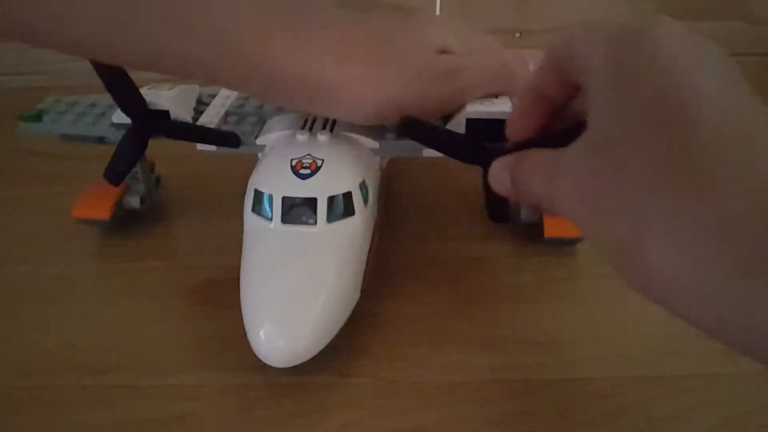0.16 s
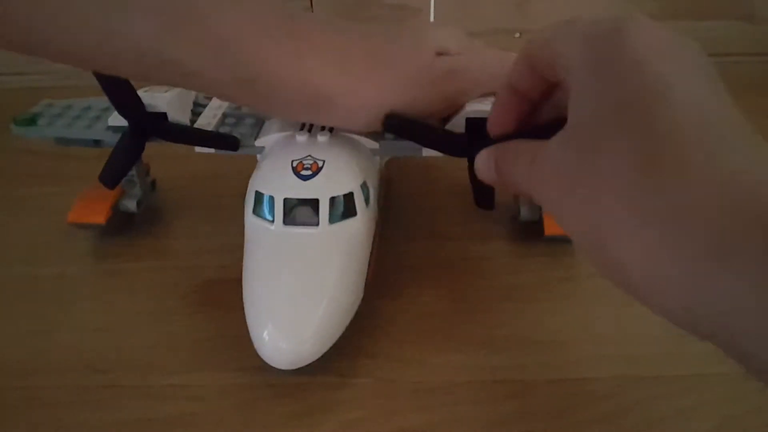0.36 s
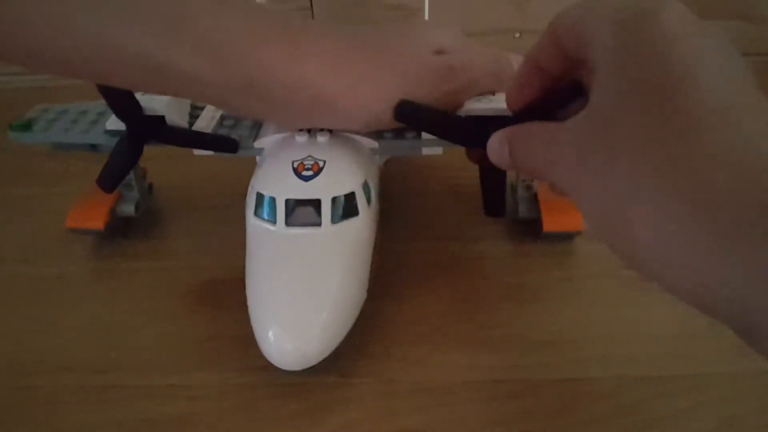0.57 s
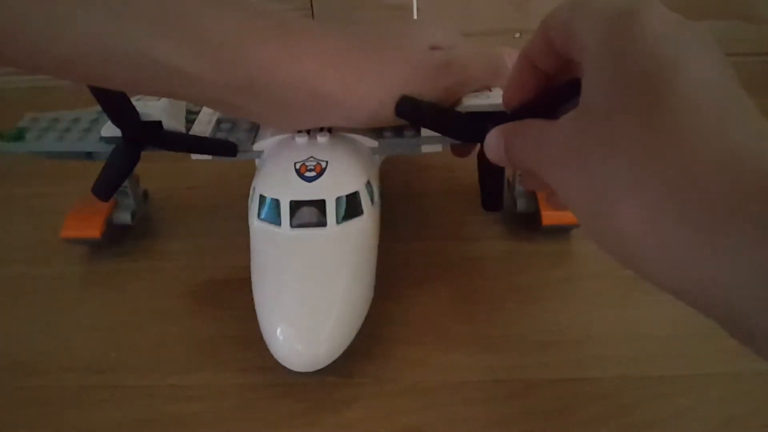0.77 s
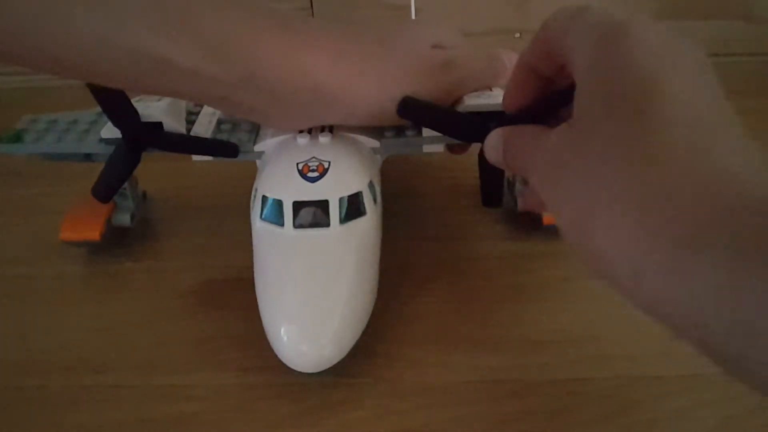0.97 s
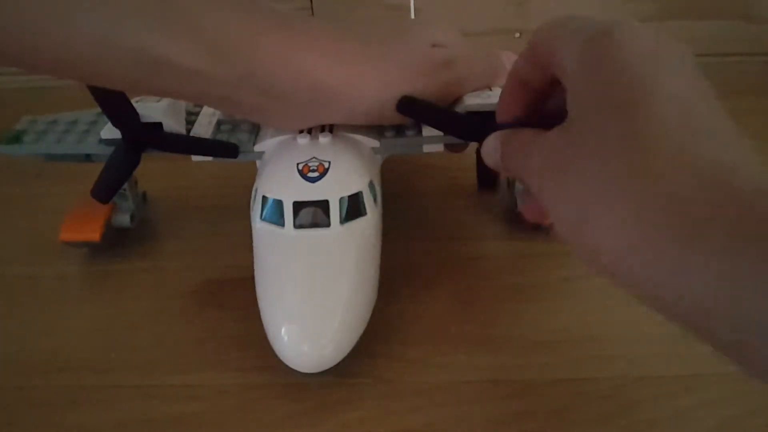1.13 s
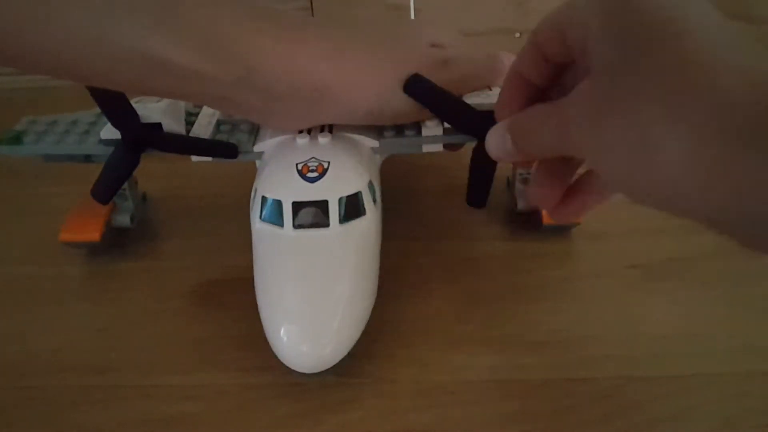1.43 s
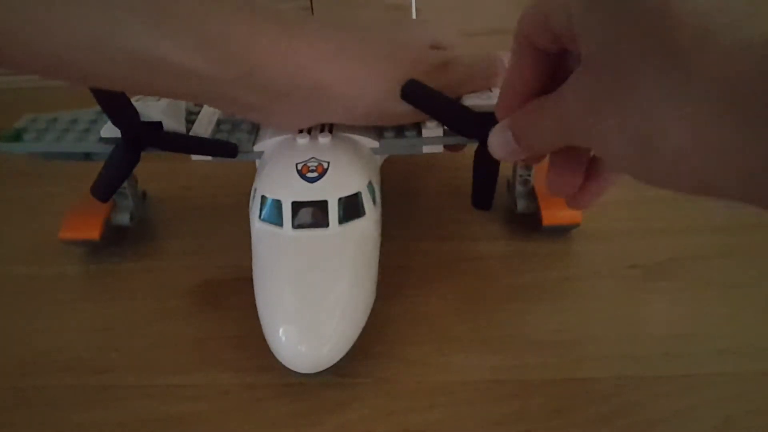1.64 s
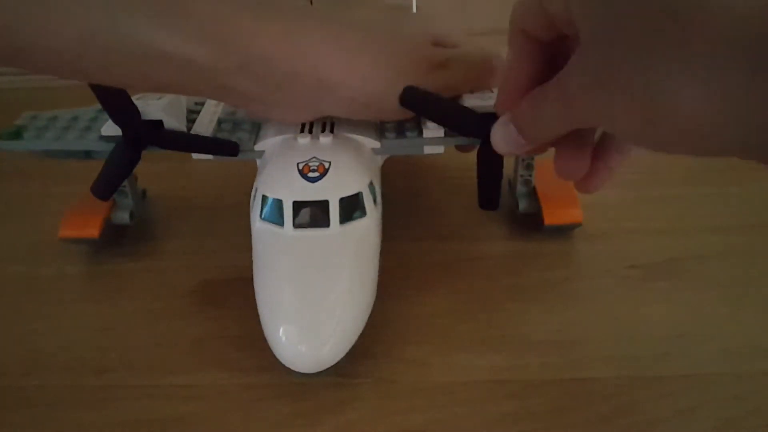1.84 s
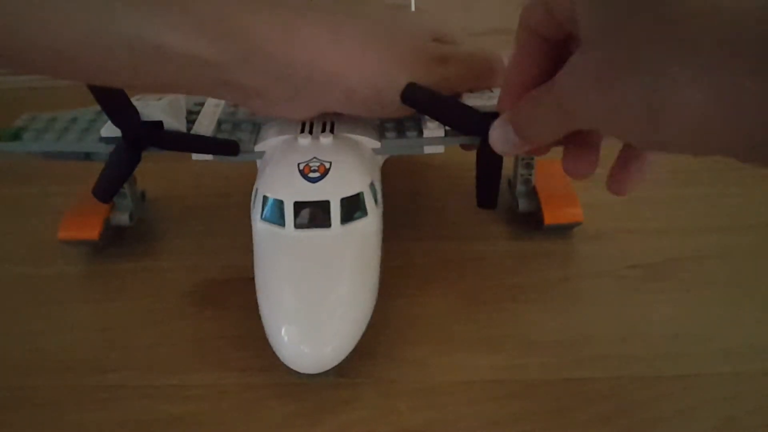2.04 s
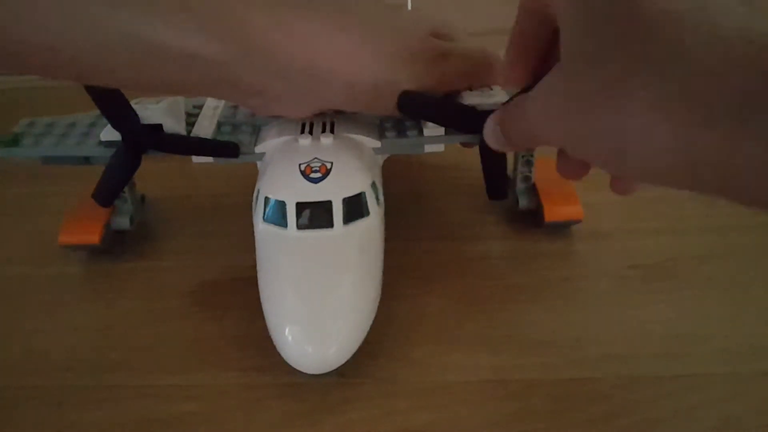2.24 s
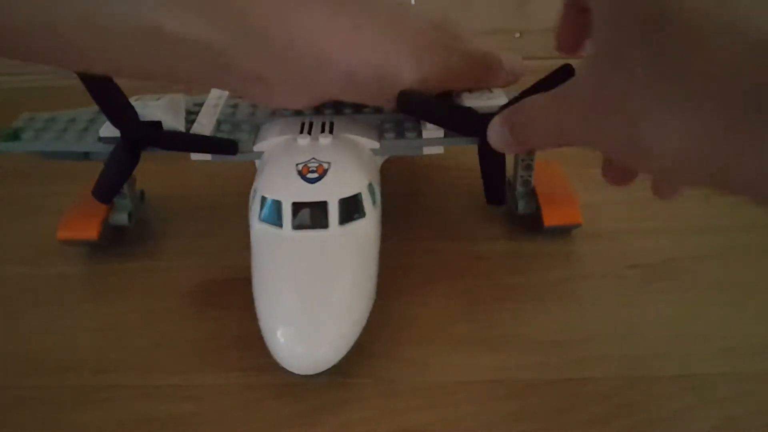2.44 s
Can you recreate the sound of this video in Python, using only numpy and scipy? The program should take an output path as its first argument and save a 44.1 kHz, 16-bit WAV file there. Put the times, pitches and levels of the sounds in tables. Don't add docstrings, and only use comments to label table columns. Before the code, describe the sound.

Hard plastic building pieces snap and knock on a hollow toy model, thumping the wooden table

```python
import sys
import numpy as np
from scipy import signal
from scipy.io import wavfile

SR = 44100
rng = np.random.default_rng(int(sys.argv[2]) if len(sys.argv) > 2 else 0)


def boost_factor(decibels):
    exponent = np.asarray(decibels, float) / 20
    return 10 ** exponent


def waveform_to_disk(signal):
    frames = np.transpose(np.atleast_2d(signal))
    scaled = np.clip(frames, -1, 1) * 32767
    samples = np.round(scaled).astype(np.int16)
    wavfile.write(sys.argv[1], SR, samples)


N = 114660

RIGHT_LAG_SAMPLES, RANDOM_POLARITY_ABOVE_HZ = 5, 1900
SHELL_LOW_HZ = 302.6


def rms_one(x):
    return x / np.sqrt(np.mean(x ** 2) + 1e-20)


def at_hz(points, hz):
    point_hz, value = np.array(points).T
    return np.interp(np.log(hz), np.log(point_hz + 1), value)


def butter(x, edge_hz, kind):
    return signal.sosfilt(signal.butter(2, edge_hz, kind, fs=SR, output="sos"), x)


def drift(rate_hz):
    r = np.exp(-80 * np.pi * rate_hz / SR)
    white = rng.standard_normal(N // 40 + 2002)
    slow = signal.lfilter([1], [1, -2 * r, r * r], white)[2000:]
    return np.interp(np.arange(N) / 40, np.arange(len(slow)), rms_one(slow))


def ring(clicks, hz, t60):
    r = boost_factor(-60 / (max(t60, .003) * SR))
    w = 2 * np.pi * hz / SR
    return signal.lfilter([0, np.sin(w)], [1, -2 * r * np.cos(w), r * r], clicks + 1e-18)


# frequency in Hz, correlation from 0 to 1.
LIKENESS = [(60, .98), (300, 0.82), (950, 0.32), (3800, 0.033), (15000, 0.016)]


def banded_noise(spectrum, shape_db, source):
    out = 0
    edges_hz = 25 * 2 ** np.arange(0, 9.6, .5)
    for k, (low, high) in enumerate(zip(edges_hz, edges_hz[1:])):
        mid, side = butter(source[k % 2], [low, high], "band")
        hz = np.sqrt(low * high)
        alike = np.clip(at_hz(LIKENESS, hz), 0, 1)
        stereo = np.sqrt(1 + alike) * mid + np.sqrt(1 - alike) * side * [[1], [-1]]
        out = out + boost_factor(at_hz(spectrum, hz) + shape_db(hz)) * stereo
    return rms_one(out)


def struck(rows, modes, below_db, scatter_db, sides_db, chatter_s, chatter_loss_db, count):
    rows = np.array(rows, float)
    s, db, pitch_hz = rows[:, :3].T
    above_db = rows[:, 3].clip(0, 40) if rows.shape[1] > 3 else below_db + 0 * s
    steps_s = rng.uniform(.5, 1.5, (len(s), count)) * chatter_s
    contact_s = s[:, None] + np.cumsum(steps_s, axis=1) - steps_s[:, :1]
    at = (contact_s * SR).astype(int).clip(0, N - 9)
    luck = rng.standard_normal((len(s), len(modes), count, 3))
    out = np.zeros((2, N))
    for m, (hz, level_db, t60) in enumerate(modes):
        octaves = np.log2(hz / pitch_hz)
        colour_db = level_db - np.where(octaves > 0, above_db, -below_db) * octaves
        loss_db = chatter_loss_db * np.arange(count)
        base_db = (db + colour_db)[:, None] - loss_db + scatter_db * luck[:, m, :, 0]
        clicks = np.zeros((2, N))
        for ch, side in enumerate((1, -1)):
            flip = np.sign(luck[:, m, :1, 1]) if ch and hz > RANDOM_POLARITY_ABOVE_HZ else 1
            polarity = flip * np.sign(luck[:, m, :, 2])
            heights = polarity * boost_factor(base_db + side * sides_db * luck[:, m, :, 1])
            np.add.at(clicks[ch], at + RIGHT_LAG_SAMPLES * ch, heights)
        out += ring(clicks, hz, t60)
    return out


# frequency in Hz, density in dB per Hz.
ROOM_TONE = [(12, -35), (20, -10.5), (127, -5), (319, -20), (574, -23), (698, -20.5), (3530, -31.5),
             (4300, -37), (16000, -42.5)]
ROOM_TONE_DB = -62
RUMBLE_HZ, RUMBLE_WIDTH_HZ, RUMBLE_DB = 103, 16, -67


def room_tone():
    rumble = rms_one(ring(rng.standard_normal(N), RUMBLE_HZ, 4.3 / RUMBLE_WIDTH_HZ))
    hiss = banded_noise(ROOM_TONE, lambda hz: .7 * drift(9), rng.standard_normal((2, 2, N)))
    lumps_db = 2.5 * drift(5)
    return boost_factor(ROOM_TONE_DB) * hiss + boost_factor(RUMBLE_DB + lumps_db) * rumble


# frequency in Hz, t60 in seconds.
ROOM_T60 = [(150, .3), (1000, 0.19), (4000, 0.2), (12000, 0.15)]
ROOM_DB, TABLE_ROOM_DB, FIRST_ECHO_S = -9, -7.5, 0.0021


def room(x):
    t = np.arange(SR // 2) / SR
    white = rng.standard_normal((2, 2, len(t)))
    tail = banded_noise([(20, 0), (20000, 0)], lambda hz: -60 * t / max(at_hz(ROOM_T60, hz), .02), white)
    tail = tail * np.clip(t / FIRST_ECHO_S - 1, 0, 1) / np.sqrt(len(t))
    return signal.fftconvolve(x[None], tail, axes=1)[:, :N]


# start in seconds, length in seconds, level in dB.
RUBS = [
    (0.316, 0.3, -65.5),
    (0.58, .19, -65.5),
    (0.88, 0.14, -86),
    (1.28, .13, -77),
    (1.504, 0.056, -57),
    (1.61, 0.183, -62.5),
    (2.08, 0.21, -74.5),
    (2.385, .3, -58.5),
]
# frequency in Hz, density in dB per Hz.
RUB_SPECTRUM = [(88, -53), (150, -5.5), (204, -3.5), (226, -15.5), (489, -8.5), (533, -35), (701, -16),
                (9000, -44), (11700, -71), (19800, -120)]
RUB_EDGE_S, RUB_GRAINS_PER_S = 0.018, 500


def rubs():
    t = np.arange(N) / SR
    level = 0
    for s, length_s, db in RUBS:
        level = level + boost_factor(db) * np.clip(np.minimum(t - s, s + length_s - t) / RUB_EDGE_S, 0, 1)
    white = rng.standard_normal((2, 2, N))
    slips = rng.random(N) < RUB_GRAINS_PER_S / SR
    slip_db = 3.0 * rng.exponential(1, N).clip(0, 4)
    grains = white * (.15 + slips * boost_factor(slip_db))
    return level * boost_factor(2.0 * drift(22)) * banded_noise(RUB_SPECTRUM, lambda hz: 1.02 * drift(11.3), grains)


# start in seconds, peak in dB, pitch of strongest ring in Hz.
THUMPS = [(0.139, -26, 123), (0.164, -20.5, 153), (0.359, -51, 254), (0.571, -27.5, 98),
          (0.658, -44.5, 128), (0.904, -41, 146), (1.05, -48, 231.3), (1.113, -50, 255), (1.198, -57, 115),
          (1.37, -47, 103), (1.523, -43, 108), (1.637, -50.5, 328), (1.703, -34.5, 245),
          (2.143, -51.5, 133), (2.23, -56.5, 203), (2.26, -35.5, 122), (2.291, -25.5, 330),
          (2.331, -34.5, 154), (2.401, -51, 295), (2.427, -42.5, 104), (2.483, -42, 99), (2.505, -40, 348),
          (2.528, -42, 244), (2.553, -54, 150)]
# frequency in Hz, level in dB, t60 in seconds.
TABLE_MODES = [(88, -13.5, .12), (125, -2.5, 0.061), (157.1, -4, .2), (212.5, -8.5, 0.084),
               (241, -4.5, 0.12), (286, -2.5, 0.051), (331, 5, 0.05), (444.5, -2.5, .06), (470, -19.5, .06),
               (616, -1, 0.05)]
TABLE_DB, MIC_LOW_HZ = -4, 69.4


def table():
    hits = struck(THUMPS, TABLE_MODES, below_db=7.5, scatter_db=0.5, sides_db=-0.7,
                  chatter_s=0.00219, chatter_loss_db=5.5, count=2)
    return boost_factor(TABLE_DB) * butter(hits, [MIC_LOW_HZ, 700], "band")


def stud_modes():
    return [(hz, 0, 40.8 / hz) for hz in np.geomspace(3858, 14870, num=18)]


# start in seconds, peak in dB, pitch in Hz, dullness in dB per octave.
TICKS = [(0.1642, -16.5, 4240, 13.5), (0.5701, -30, 4200, 11), (1.4965, -66, 4200, -7),
         (1.6833, -36, 9100, 4), (2.262, -49.5, 4200, 8), (2.2903, -35, 4200, 26), (2.2943, -27, 4650, 9.5),
         (2.3425, -47.5, 4200, 17), (2.3999, -55, 4520, 0), (2.4834, -42.5, 4520, 7),
         (2.5249, -55.5, 4310, -0.5)]
# start in seconds, peak in dB, pitch in Hz, dullness in dB per octave.
PRICKS = [
    (1.2225, -54.5, 10000, 8),
    (1.9865, -61, 10500, 20.0),
]
# start in seconds, level in dB, pitch in Hz, dullness in dB per octave.
RUSTLES = [
    (1.300, -68, 9000, 4.0),
    (1.528, -60, 7500, 4.0),
]
STUD_DB, STUD_LEFT_DB = -14.5, 2


def studs():
    modes = stud_modes()
    ticks = struck(TICKS, modes, below_db=-0.5, scatter_db=-2.0, sides_db=5.5,
                   chatter_s=.0013, chatter_loss_db=3.5, count=7)
    pricks = struck(PRICKS, modes, below_db=23.0, scatter_db=2.0, sides_db=8.5,
                    chatter_s=0.00048, chatter_loss_db=3.0, count=3)
    rustles = struck(RUSTLES, modes, below_db=12.0, scatter_db=6.0, sides_db=3.0,
                     chatter_s=.0028, chatter_loss_db=.1, count=16)
    balance_db = STUD_LEFT_DB * np.array([[.5], [-.5]])
    return boost_factor(STUD_DB + balance_db) * (ticks + pricks + rustles)


# start in seconds, peak in dB, pitch of strongest ring in Hz,
# dullness in dB per octave.
KNOCKS = [(0.163, -18, 875, 1), (0.362, -57, 826, 15.5), (0.57, -26, 1560, 7), (0.703, -42.5, 735, 18),
          (0.744, -57, 883, 11), (0.904, -45.5, 880, 23), (0.929, -65.5, 730, 8), (1.048, -40, 899, 24),
          (1.066, -51, 940, 15), (1.104, -60, 918, 18), (1.119, -57, 869, 3), (1.175, -53.5, 868, 10.5),
          (1.372, -50, 877, 23), (1.496, -64, 2600, 6), (1.523, -43, 830, 12), (1.532, -54.5, 1130, 5),
          (1.541, -43, 930, 9), (1.637, -47.5, 1170, 19), (1.655, -50, 1450, 10), (1.688, -45, 1190, -4),
          (1.711, -44.5, 1110, 8.5)]
# start in seconds, peak in dB, pitch of strongest ring in Hz,
# dullness in dB per octave.
LOOSENING = [(2.143, -52, 873, 19), (2.231, -57, 1460, 13), (2.261, -45.5, 1600, 5.5),
             (2.289, -25.5, 1340, 6), (2.331, -36.5, 910, 10), (2.342, -60, 1390, 3), (2.401, -51, 780, 5),
             (2.428, -55, 1260, 5), (2.483, -45, 1010, 4.5), (2.505, -43.5, 700, 6), (2.526, -52, 848, 5),
             (2.556, -51.5, 899, 6), (2.58, -49.5, 883, 8.5)]
# start in seconds, peak in dB, pitch in Hz, dullness in dB per octave.
SCRAPES = [
    (0.1395, -50, 1500, 8),
]
# start in seconds, first level in dB, pitch in Hz, dullness in dB per octave.
SLIPS = [
    (0.5645, -52.5, 1510, 3.5),
]
# frequency in Hz, level in dB, t60 in seconds.
SHELL_MODES = [(709, -10, 0.01), (875, -4, 0.053), (929, -3.5, 0.021), (1220.5, -1.5, .04),
               (1413, -1, 0.015), (1624, -6, 0.039), (1827, -0.5, 0.061), (2160, -5.5, 0.094),
               (2477, 1, 0.033), (2695, -4.5, .04), (3237, 4.5, 0.012), (3720, -3.5, .025)]
SHELL_DB, RING_CYCLES = -4.5, 32


def shell():
    modes = [(hz, db, min(t60, RING_CYCLES / hz)) for hz, db, t60 in SHELL_MODES]
    modes += [(hz * 1.059, db - 2.5, t60 * 0.77) for hz, db, t60 in modes[1::2]]
    knocks = struck(list(KNOCKS) + list(LOOSENING), modes, below_db=5.0, scatter_db=3.0, sides_db=2.5,
                    chatter_s=0.001125, chatter_loss_db=4.0, count=4)
    scrape = struck(SCRAPES, modes + stud_modes(), below_db=3.0, scatter_db=5.5, sides_db=5.5,
                    chatter_s=.0013, chatter_loss_db=-0.53, count=16)
    slip = struck(SLIPS, modes + stud_modes(), below_db=-7.0, scatter_db=2.5, sides_db=2.5,
                  chatter_s=0.00062, chatter_loss_db=-1.5, count=6)
    return boost_factor(SHELL_DB) * (knocks + scrape + slip)


def scene():
    plastic = butter(shell() + studs(), SHELL_LOW_HZ, "high")
    wood = table()
    scattered = butter(plastic[0] * (.6 + .8 * drift(120)), SHELL_LOW_HZ, "high")
    echoes = room(boost_factor(ROOM_DB) * scattered + boost_factor(TABLE_ROOM_DB) * wood[0])
    return plastic + wood + echoes + rubs() + room_tone()


def band_limit(x):
    return signal.sosfilt(signal.butter(12, 16520, fs=SR, output="sos"), x)


def record(dry):
    low_pass = signal.cheby2(14, 20, 15900, fs=SR, output="sos")
    mix = signal.sosfilt(low_pass, dry)
    return band_limit(mix)


dry = scene()
out = record(dry)
waveform_to_disk(out)
```